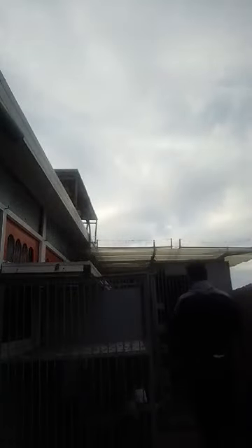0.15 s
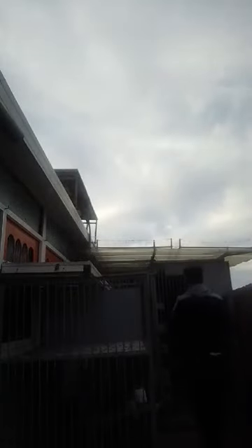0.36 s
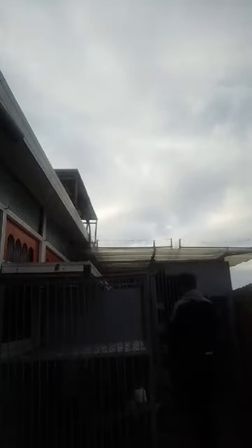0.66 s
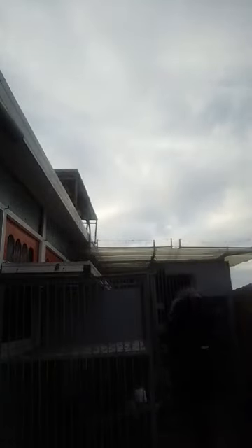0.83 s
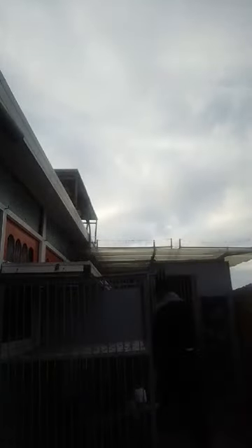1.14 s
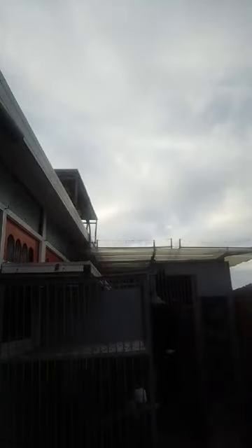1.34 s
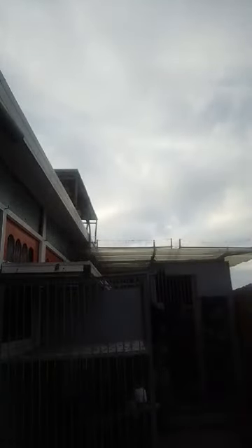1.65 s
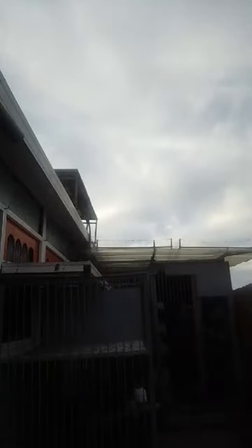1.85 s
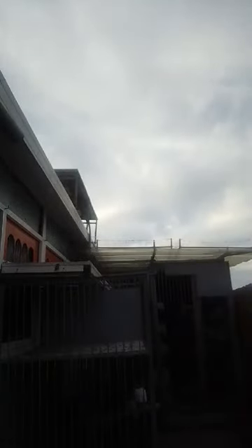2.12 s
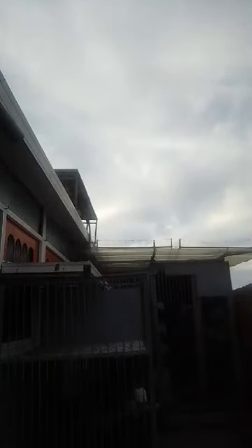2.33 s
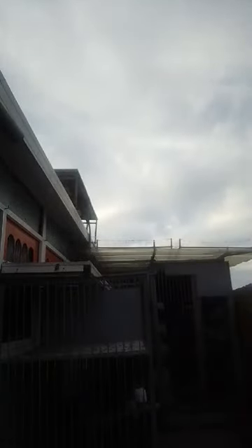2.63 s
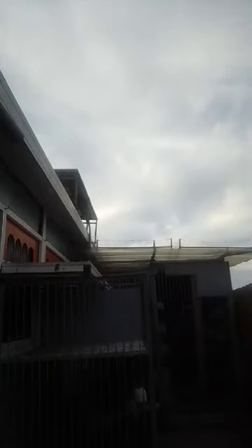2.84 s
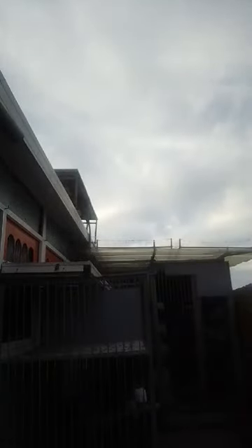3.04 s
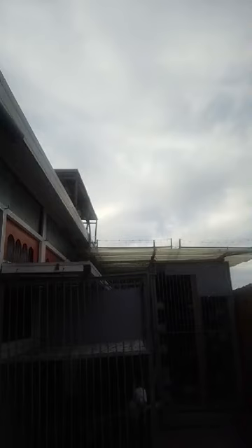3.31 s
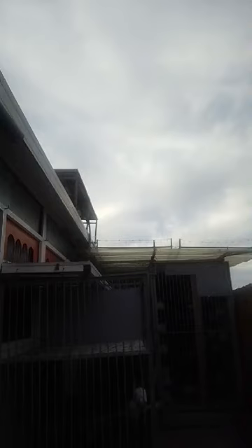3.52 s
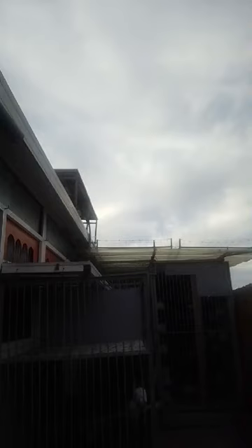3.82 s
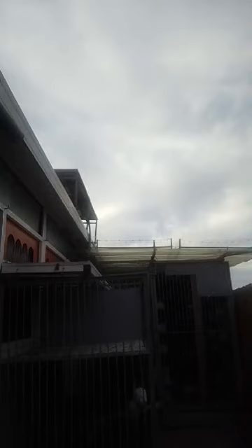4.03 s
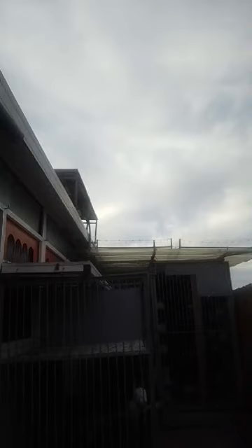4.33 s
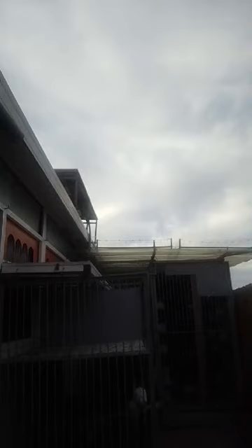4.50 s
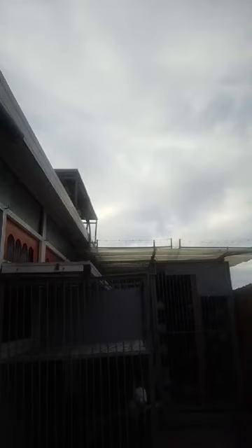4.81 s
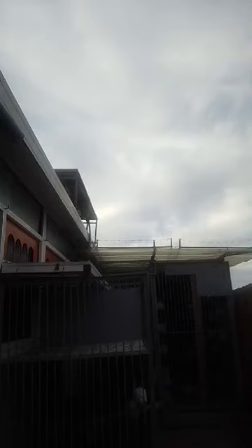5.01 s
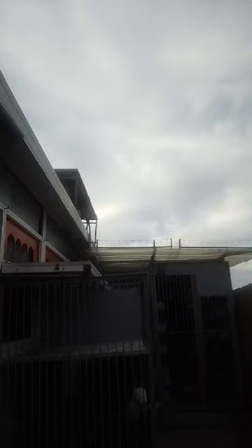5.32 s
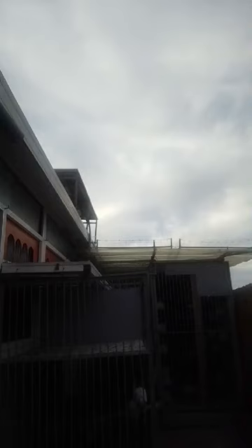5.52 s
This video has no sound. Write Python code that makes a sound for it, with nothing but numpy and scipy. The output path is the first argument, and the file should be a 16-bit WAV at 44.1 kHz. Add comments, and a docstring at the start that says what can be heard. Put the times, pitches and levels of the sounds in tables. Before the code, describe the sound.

A quiet outdoor rooftop loft, heard close in mono with little deep bass and softened top treble. From 0 to 0.15 s, crisp claw ticks and gritty scuffs crackle on boards, with another sharp tick at 0.64 s. A pigeon coos in short, rolling, fluttering phrases around 0.55-1.1, 1.6-2.25 and 2.85-3.4 s, low and throaty over a breathy murmur. Scuffing swells around 1.5-2 s, with small hollow wooden knocks scattered throughout. At about 3.05-3.25 s a hinge gives thin, high, rough squeaks, then at 3.3 s the metal gate slams: a loud, dense rattle whose treble dies first, lower clatter lingering through roughly half a second. A faint lower squeak follows at 3.75 s. Coos return at 4.2-4.65 and 5.35-5.65 s, with ticks and shuffling around 4.9-5.2 s, knocks, and a mid-high squeak swelling at 5.5 s. Faint floor thuds and distant town hum and breeze lie beneath.

```python
"""Rooftop loft, outdoors: a pigeon coos in short rolled phrases, sliding, fluttering tones over a rough murmur.
Close by, feet and claws scuff the boards (clicky noise through resonances) and knock on perches.
A wire gate squeaks on its hinge in stick-slip tones and slams as a rattle that dies band by band.
Behind them lie thuds through the floor and the far air, both shaped noise.
The microphone channel is mono; near sounds lose their deep bass, and the top treble is cut."""
import sys
import numpy as np
from scipy import signal
from scipy.io import wavfile

SR = 44100
rng = np.random.default_rng(int(sys.argv[2]) if len(sys.argv) > 2 else 0)


def put_to_file(sound):
    """Save the sound as 16-bit audio at rate SR, in the file named by the first command-line argument."""
    columns = np.atleast_2d(sound).T  # one column per channel
    safe = np.clip(columns, -1, 1)
    whole_steps = np.round(safe * 32767)
    wavfile.write(sys.argv[1], SR, whole_steps.astype(np.int16))


N = 249606   # samples

# Levels are those at the source, before echoes, bass cut and treble cut.
# High throbs of the coo, short and sagging: [peak t/s, length/s between edges, f/Hz at peak, peak level/dB]
HIGH_THROBS = [(0.555, 0.032, 433, -57), (0.643, 0.039, 401, -55.5), (0.691, 0.03, 372, -56),
               (0.718, 0.017, 409, -38), (0.746, 0.021, 400, -42), (0.777, 0.046, 377, -44.5),
               (0.8, 0.045, 431, -51), (0.957, 0.028, 387, -59), (1.029, 0.059, 409, -56),
               (1.061, 0.042, 384, -52.5), (1.119, 0.13, 456, -62), (1.531, 0.028, 402, -54),
               (1.63, 0.014, 518, -50), (1.7, 0.088, 405, -52.5), (1.745, 0.02, 453, -44),
               (1.762, .026, 375, -50.5), (1.807, 0.07, 395, -47), (1.869, 0.015, 410, -33),
               (1.895, 0.019, 431.4, -43), (1.93, 0.046, 403, -43.5), (2.113, 0.038, 379, -49),
               (2.187, 0.094, 390.6, -59), (2.255, 0.07, 432, -60.5), (2.684, 0.068, 375, -66),
               (2.72, 0.067, 478, -65), (2.84, .03, 417, -64), (2.89, 0.055, 373, -59),
               (2.962, 0.022, 396, -43), (2.996, 0.037, 373, -43), (3.028, 0.022, 394, -34.5),
               (3.06, .047, 360, -40.5), (3.117, 0.06, 360, -47.5), (3.141, 0.041, 408, -50.5),
               (3.188, .025, 367, -52.5), (3.272, 0.035, 366, -42), (3.316, 0.095, 363, -43),
               (4.226, .02, 383, -49), (4.255, 0.035, 392, -50), (4.304, 0.049, 362, -43),
               (4.338, 0.13, 387.3, -53.5), (4.402, 0.017, 363, -53.5), (4.474, .025, 363, -54),
               (4.517, 0.042, 377, -42), (4.558, 0.04, 368.5, -40.5), (4.603, 0.059, 378.5, -50),
               (4.633, .045, 377, -51), (4.911, 0.026, 412, -50.5), (5.353, 0.054, 402, -48),
               (5.385, 0.094, 334, -54), (5.407, 0.018, 417, -34), (5.427, 0.037, 483, -40.5),
               (5.441, .016, 436, -52), (5.456, 0.02, 396, -38), (5.481, 0.029, 408, -44),
               (5.567, .035, 429, -49), (5.65, .03, 444, -55.5)]
# Low pulses of the roll, each sliding upward: [peak t/s, peak level/dB]
LOW_PULSES = [(0.6, -57.5), (0.665, -47.5), (0.786, -46), (0.994, -53.5), (1.09, -61.5), (1.828, -49.5),
              (1.9, -57), (1.937, -46.5), (2.137, -47.5), (2.19, -62), (2.254, -66), (2.868, -68),
              (2.912, -56.5), (2.989, -51), (3.079, -44), (3.157, -45), (3.337, -42.5), (3.388, -44.5),
              (3.418, -41), (4.175, -57.5), (4.25, -47.5), (4.306, -44), (4.37, -45), (4.516, -61),
              (4.542, -46.5), (4.606, -50), (4.657, -59), (5.507, -46), (5.572, -51.5), (5.612, -62)]
LOW_HZ, LOW_LENGTH_S = 298, 0.044
LOW_RISE, HIGH_SAG = 0.11, 0.036   # half the share of its pitch that a throb slides in one length
SWELL_SHARE = 0.43   # part of a throb's length that lies before its peak

# Resonances of the coo's murmur: [f/Hz, width/Hz of each of two passes, relative level/dB]
MURMUR_MODES = [(298.6, 53, 1), (382.7, 114, 5.5), (460, 130, -5)]
# Phrases under which the murmur swells: [start t/s, held/s, target level/dB]
MURMUR_PHRASES = [(0.0, 0.044, -71), (0.35, 0.068, -70), (0.6, 0.27, -76.5), (0.97, 0.066, -60.5),
                  (1.45, 0.39, -72), (1.78, 0.21, -56), (2.08, .15, -60.5), (2.37, 0.024, -80),
                  (2.65, 0.06, -72), (2.83, 0.11, -67.5), (2.97, 0.29, -63.5), (3.42, 0.089, -50.5),
                  (3.95, 0.28, -72), (4.55, 0.23, -67), (4.87, 0.33, -68), (5.33, 0.41, -59)]
MURMUR_BED_DB, MURMUR_RISE_S, MURMUR_T60_S = -90, 0.034, 0.5

# Claw and grit ticks, and at 3.33 s the sharp crack as the gate hits its frame: [t/s, peak level/dB, level/dB
# of the scrape, level/dB of the shaken mesh and boards]
CLAW_TICKS = [(0.0339, -30.5, -40, -80), (0.0416, -37, -60, -79), (0.0476, -37.5, -61, -82),
              (0.0946, -39.5, -41.5, -63), (0.1458, -31.5, -40.5, -56), (0.3357, -50.5, -64.5, -72),
              (0.43, -75, -69, -77), (0.533, -70, -65.5, -72), (0.637, -30.5, -40.5, -59.5),
              (0.754, -70, -58.5, -85), (0.884, -57.5, -72, -73), (1.01, -63, -67, -77),
              (1.07, -66, -75, -77), (1.2366, -52, -63.5, -69), (1.4383, -50, -53, -61),
              (1.542, -45, -43, -60), (1.6412, -38.5, -40, -57.5), (1.745, -67, -54.5, -63),
              (1.983, -47.5, -81, -82), (2.041, -55, -48.5, -49), (2.101, -51, -50.5, -57),
              (2.3235, -51, -74, -96), (2.373, -53, -57, -68), (2.599, -62, -70, -75),
              (3.187, -56, -52.5, -85.5), (3.2025, -59, -75, -88), (3.33, -52, -53, -70),
              (3.6115, -50, -62.5, -71), (3.7832, -47, -57, -99), (4.099, -59, -81, -75),
              (4.21, -72, -74, -74), (4.4656, -61, -66.5, -73), (4.702, -64, -56, -74),
              (4.73, -48.5, -54, -77), (4.8749, -42, -49.5, -60), (4.9724, -43.5, -43.5, -74),
              (5.017, -44, -43, -61), (5.0738, -43, -55, -64), (5.157, -49, -48, -86),
              (5.2664, -69, -56, -65)]
# Colour of one tick: [f/Hz, level/dB per Hz]
TICK_SPECTRUM = [(1000, -30), (1600, -14), (3000, -5), (4600, 0), (6000, -6)]
# Hiss of grit under feet: [f/Hz, level/dB per Hz]
GRIT_SPECTRUM = [(1350, -82.5), (2300, -12.5), (3030, -19.5), (3920, -2), (4520, 0), (6530, -38),
                 (13700, -32), (14500, -38), (15000, -61)]
# Mesh wires ringing under the grit: [lowest f/Hz, highest f/Hz, width/Hz of each of two passes]
WIRE_RANGE = (2500, 6900, 57)
# Resonances of the boards: [f/Hz, width/Hz of each of two passes, relative level/dB]
BOARD_MODES = [(693, 262, 16), (811, 130, 7.5), (978, 35, 5), (474.5, 98, 12)]
# Resonances of the mesh: [f/Hz, width/Hz of each of two passes, relative level/dB]
MESH_MODES = [(1636, 290, 10.5), (2190, 170, 0), (2830, 130, 4)]
# Bustle about the loft: [t/s, grit level/dB, boards level/dB]
BUSTLE_CURVE = [(0.0, -55, -55.5), (0.04, -65.5, -68), (0.2, -63.5, -75.5), (0.3, -75, -79),
                (0.6, -85.5, -92), (1.0, -81, -83), (1.3, -68.5, -75), (1.5, -57.5, -58.5),
                (1.75, -63.5, -56.5), (1.93, -64, -54.5), (2.02, -64.5, -68.5), (2.15, -62, -73),
                (2.3, -70.5, -71), (2.43, -71.5, -68), (2.53, -75.5, -95), (2.7, -78, -77),
                (2.85, -72, -75), (3.0, -79.5, -76.5), (3.17, -93, -82), (3.6, -102, -54.5),
                (3.76, -66, -76), (3.95, -80.5, -76.5), (4.22, -75.5, -72), (4.44, -88, -88.5),
                (4.75, -80, -64), (4.85, -69, -71), (5.0, -61, -57.5), (5.25, -63, -60.5), (5.44, -70, -63),
                (5.66, -73.5, -72)]
MESH_VS_BUSTLE_DB = -10   # against the mean of the grit and boards levels
BOARDS_VS_MESH_DB = -4.5   # when a tick shakes both
SCRAPE_T60_S, SHAKE_T60_S = 0.17, 0.22

# Hinge squeaks: [start t/s, start f/Hz, top level/dB rms, top level/dB rms of the octave, rise/s, fade t60/s,
# glide/Hz per s, roughness 0-1]
HINGE_SQUEAKS = [(2.765, 4560, -65, -95, .01, .25, 300, .8), (3.047, 4290, -44, -85, .015, .33, -300, .55),
                 (3.05, 3740, -58, -95, .03, .5, -100, .8), (3.184, 4240, -45, -85, .014, .14, 2500, .7),
                 (3.181, 3630, -63, -95, .008, .3, 500, .9), (3.21, 4370, -45, -85, .048, .2, 1500, .5),
                 (3.195, 2900, -68, -95, .035, .2, 50, .6), (3.745, 2150, -60, -77, .03, .45, -50, .5),
                 (5.45, 2105, -50, -37, .115, .5, 20, .4), (5.15, 2790, -56, -62, .014, .56, -250, .9)]

# Colour of the slam: [f/Hz, relative level/dB per Hz]
SLAM_SPECTRUM = [(200, -20), (300, -3.5), (460, -9), (620, 0.5), (850, -9.5), (1200, -27), (1450, -11.5),
                 (3000, -7), (4300, 6), (5200, -0.5), (6500, -16), (8400, -49), (9700, -38.5), (13500, -18)]
# Fade of the slam: [f/Hz, t60/s]
SLAM_FADE = [(200, 1), (530, 0.66), (1390, 0.67), (3680, 0.36), (5000, 0.25), (6500, .17), (9700, 0.11)]
SLAM_S, SLAM_DB = 3.315, -29   # start; rms level of the first 0.1 s
SLAM_RISE_S, BASS_LAG_CYCLES = 0.011, 8.0   # each band takes the rise plus this many of its cycles

# Hollow knocks on perches and boxes: [t/s, level/dB before the onset is softened, f/Hz]
WOOD_KNOCKS = [(0.153, -43, 810), (0.425, -52.5, 613), (0.785, -53.5, 1014), (0.787, -56, 798),
               (0.81, -56.5, 1010), (1.012, -59, 797), (1.164, -53, 567), (1.239, -57, 691),
               (1.36, -56, 668), (2.393, -55, 735), (3.612, -42.5, 840), (4.469, -41, 678),
               (4.774, -51, 718), (4.973, -45, 949), (5.273, -46, 679), (5.314, -43.5, 642)]
KNOCK_T60_S = 0.12

# Echoes off walls around the roof: [delay t/s, level/dB]
WALL_ECHOES = [(.013, -16), (.029, -25.5), (0.048, -14)]

# Resonances of the floor: [f/Hz, width/Hz of each of two passes, relative level/dB]
THUD_MODES = [(74.4, 36, -4), (110, 19, -6.5)]
# Heavy steps felt through the roof: [t/s, level/dB before the onset is softened]
HEAVY_STEPS = [(0.1, -77), (0.6, -80), (1.0, -86), (1.85, -71), (2.05, -77), (2.24, -93), (3.0, -88),
               (3.32, -73), (3.47, -76), (4.201, -93), (4.68, -93), (4.86, -69), (5.07, -70), (5.5, -78),
               (5.63, -71)]
THUD_BED_DB, THUD_T60_S = -91, 0.41

# Colour of the far air: [f/Hz, relative level/dB per Hz]
AIR_SPECTRUM = [(26, -56), (45, -25.5), (156, -21.5), (281, -6), (386, 2.5), (614, -5.5), (804, -7),
                (1220, -17), (1710, -19.5), (2410, -17.5), (4550, -11.5), (8190, -21.5), (12100, -22),
                (13300, -14), (15400, -41.5)]
AIR_DB = -73   # rms
BASS_CUT_HZ, TREBLE_STEP_HZ, CUTOFF_HZ = 202, 15000, 15600


def coo(edge_db=-12, squareness=2.6, rough=0.14):
    """Each throb is a tone from the inflated throat that starts and stops briskly, slides in pitch and flutters."""
    throbs = [(*row, -HIGH_SAG) for row in HIGH_THROBS]
    throbs += [(s, LOW_LENGTH_S, LOW_HZ, db, LOW_RISE) for s, db in LOW_PULSES]
    out, start_turn = np.zeros(N), rng.random(len(throbs))
    flutter = fuzz(rough, rate=43.3)
    for k, (s, length, hz, db, slide) in enumerate(throbs):
        at = np.arange(round((s - length) * SR), min(round((s + length) * SR), N))
        t = at / SR - s
        side = np.where(t < 0, SWELL_SHARE, 1 - SWELL_SHARE)
        shape = from_db(db + edge_db * np.abs(t / length / side) ** squareness)
        phase = 2 * np.pi * (hz * t * (1 + slide * t / length) + start_turn[k])
        own_flutter = np.roll(flutter, 997 * k)[at]   # another stretch for each throb
        out[at] += shape * np.real(own_flutter * np.exp(1j * phase))
    return out


def coo_murmur():
    """The rough, breathy murmur of the coo: noise resonating in its pitch range, swelling under each phrase."""
    level = from_db(MURMUR_BED_DB) + bursts(MURMUR_PHRASES, MURMUR_RISE_S, MURMUR_T60_S)
    return level * from_db(2.0 * drift(15)) * resonate(rng.standard_normal(N), MURMUR_MODES)


def scuffing():
    """Grit hisses under feet, boards rumble in lumps and the mesh buzzes; ticks leave short scrapes."""
    grit_db, boards_db = in_time(BUSTLE_CURVE)
    s, _, scrape_db, shake_db = np.transpose(CLAW_TICKS)
    scrapes = bursts(zip(s, 0 * s, scrape_db), 0.005, SCRAPE_T60_S)
    shake = bursts(zip(s, 0 * s, shake_db), 0.0075, SHAKE_T60_S)

    effort = from_db(grit_db + 2.0 * drift(42)) + scrapes
    grit = effort * gritty_noise()

    rub = grains(per_s=500, spread_db=2.5, smooth=0.67)
    boards_level = from_db(boards_db) + from_db(BOARDS_VS_MESH_DB) * shake
    boards = boards_level * from_db(2.0 * drift(12)) * resonate(rub[0], BOARD_MODES)

    mesh_level = from_db((grit_db + boards_db) / 2 + MESH_VS_BUSTLE_DB) + shake
    mesh_rub = rub[1] + 1.9 * rub[0]   # partly the same rubbing as the boards
    mesh = mesh_level * from_db(1.0 * drift(39)) * resonate(mesh_rub, MESH_MODES)
    return claw_ticks() + grit + boards + mesh


def claw_ticks():
    """Each tick is one click ringing briefly through the tick's colour."""
    s, db, _, _ = np.transpose(CLAW_TICKS)
    clicks = np.zeros(N)
    clicks[np.round(s * SR).astype(int)] = from_db(db)
    impulse = np.eye(1, 400).repeat(2, axis=0)
    ring = sum(band for _, band in bands(impulse, TICK_SPECTRUM))
    # claws are blunter than grit
    ring = signal.sosfilt(signal.butter(8, 6300, fs=SR, output="sos"), ring)
    return np.convolve(clicks, ring / np.abs(ring).max())[:N]


def gritty_noise():
    """Rubbed sand: a band-by-band wandering hiss with wires ringing under it, rms 1."""
    sand = grains(per_s=1500, spread_db=2.0, smooth=1.0)
    hiss = rms_one(sum(band * from_db(2.4 * drift(6)) for _, band in bands(sand, GRIT_SPECTRUM)))
    return rms_one(hiss + from_db(-6) * wires(sand[0]))


def wires(sand, count=18, swing_db=3.0):
    """Narrow wire notes; which wires are rubbed changes from moment to moment."""
    low, high, width = WIRE_RANGE
    pitches = np.geomspace(low, high, count) * (1 + 0.023 * rng.standard_normal(count))
    out = 0
    for hz in pitches:
        level = from_db(at_hz(GRIT_SPECTRUM, hz) + swing_db * drift(2.2))
        out = out + level * resonate(sand, [(hz, width, 0)])
    return rms_one(out)


def hinge(throb_db=2.0, lasts=0.42, release_s=0.02):
    """Stick-slip tones that swell, fade and let go, the octave more steeply, blurred by uneven slips."""
    out, slips = np.zeros(N), fuzz(1, rate=75.0)
    throb = from_db(throb_db * drift(30))
    for k, (s, hz, db, octave_db, rise, t60, glide, rough) in enumerate(HINGE_SQUEAKS):
        length = rise + lasts * t60   # cut off before the fade is done
        at = np.arange(round(s * SR), min(round((s + length) * SR), N))
        t, rough = at / SR - s, np.clip(rough, 0, 1)
        swell_db = -28 * np.abs(1 - t / rise) ** 1.33
        shape_db = np.where(t < rise, swell_db, -60 * (t - rise) / t60)
        turn = np.exp(2j * np.pi * (hz * t + glide * t ** 2 / 2))
        tone = from_db(db + shape_db) * turn + from_db(octave_db + 2.06 * shape_db) * turn ** 2
        own_slips = np.roll(slips, 1999 * k)[at]   # another stretch for each squeak
        blur = np.sqrt(1 - rough) + np.sqrt(rough) * own_slips
        let_go = np.minimum((length - t) / release_s, 1)
        out[at] += np.sqrt(2) * throb[at] * let_go * np.real(blur * tone)
    return out


def slam():
    """The gate hits its frame: a dense rattle that dies band by band, the lows building up later."""
    t, out = np.maximum(np.arange(N) / SR - SLAM_S, 0), 0
    rattle = grains(per_s=2500, spread_db=1.0, smooth=0.92)
    for hz, band in bands(rattle, SLAM_SPECTRUM):
        rise = 1 - np.exp(-(t / (SLAM_RISE_S + BASS_LAG_CYCLES / hz)) ** 2)
        fade = from_db(-60 * t / at_hz(SLAM_FADE, hz) + 2.7 * drift(17))
        out = out + band * rise * fade
    return from_db(SLAM_DB) * out / out[round(SLAM_S * SR):][:SR // 10].std()


def knocks(rise_s=0.0047):
    """Each knock is one rough, damped wooden note."""
    out, rattle = np.zeros(N), fuzz(0.48, rate=65.0)
    for s, db, hz in WOOD_KNOCKS:
        first = round(s * SR)
        t = np.arange(N - first)[:SR // 2] / SR
        level = from_db(db - 60 * t / KNOCK_T60_S) * (1 - np.exp(-t / rise_s))
        note = level * np.exp(2j * np.pi * hz * t)
        out[first:][:len(t)] += np.real(note * rattle[first:][:len(t)])
    return out


def loft_echo(x):
    """A few echoes off nearby walls, each a delayed, weaker copy."""
    echoes = sum(from_db(db) * np.roll(x, round(s * SR)) * (np.arange(N) > s * SR) for s, db in WALL_ECHOES)
    return x + echoes


def footfalls():
    """Weight shifting on the roof thuds up through the floor as bursts of low resonant noise."""
    steps = [(s, 0, db) for s, db in HEAVY_STEPS]
    level = from_db(THUD_BED_DB) + bursts(steps, 0.018, THUD_T60_S)
    return level * from_db(1.0 * drift(14)) * resonate(rng.standard_normal(N), THUD_MODES)


def air(patchy_db=2.5, steady_hz=3000):
    """Far town hum and breeze: noise that wanders band by band; the treble hiss is steadier."""
    together, noise, out = drift(1.3), rng.standard_normal((2, N)), 0
    for hz, band in bands(noise, AIR_SPECTRUM):
        wander_db = patchy_db / (1 + hz / steady_hz) * (0.27 * together + drift(7))
        out = out + band * from_db(wander_db)
    return from_db(AIR_DB) * rms_one(out)


def from_db(db):
    """Gain of a level in dB."""
    return 10 ** (np.asarray(db) / 20)


def rms_one(x):
    """Scaled to rms 1."""
    return x / np.sqrt(np.mean(x ** 2) + 1e-20)


def in_time(rows):
    """Columns of a curve at every sample."""
    s, *columns = np.transpose(rows)
    return [np.interp(np.arange(N) / SR, s, c) for c in columns]


def at_hz(points, hz):
    """The second column read on a log-frequency axis."""
    points = np.array(points)
    return np.interp(np.log(hz), np.log(points[:, 0]), points[:, 1])


def drift(rate):
    """Slow chance of rms 1: noise through two equal one-pole low-passes at rate Hz."""
    r = np.exp(-2 * np.pi * rate * 20 / SR)   # drawn at every 20th sample
    noise = rng.standard_normal(N // 20 + 2002)
    slow = signal.lfilter([1], [1, -2 * r, r * r], noise)[2000:]   # settled part
    return np.interp(np.arange(N) / 20, np.arange(len(slow)), rms_one(slow))


def fuzz(share, rate):
    """Complex gain near 1 that shakes a tone's level and phase, widening its line."""
    share = np.clip(share, 0, 1)
    return np.sqrt(1 - share) + np.sqrt(share / 2) * (drift(rate) + 1j * drift(rate))


def bursts(events, rise_s, t60):
    """Gain that rises at each (t/s, held/s, level/dB), holds and dies away."""
    out = np.zeros(N)
    for s, held, db in events:
        at = np.arange(round(s * SR), min(round((s + held + t60) * SR), N))
        t = np.maximum(at / SR - s, 0)
        fade_db = -60 * np.maximum(t - held, 0) / t60
        out[at] += from_db(db + fade_db) * (1 - np.exp(-t / rise_s))
    return out


def grains(per_s, spread_db, smooth):
    """Two streams of uneven random clicks on a bed of noise."""
    sizes = from_db(spread_db * np.minimum(rng.exponential(1, (2, N)), 5))
    clicks = sizes * (rng.random((2, N)) < per_s / SR) * rng.choice([-1, 1], (2, N))
    return rms_one(clicks) + smooth * rng.standard_normal((2, N))


def bands(sources, spectrum):
    """Third-octave bands of two sources, dealt in turn and weighted by a spectrum: (f/Hz, band)."""
    edges = 30 * 2 ** (np.arange(28) / 3)
    for k, (low, high) in enumerate(zip(edges, edges[1:])):
        hz = np.sqrt(low * high)
        if spectrum[0][0] < hz:
            sos = signal.butter(2, [low, high], "band", fs=SR, output="sos")
            yield hz, from_db(at_hz(spectrum, hz)) * signal.sosfilt(sos, sources[k % 2])


def resonate(x, modes):
    """Parallel resonances, each applied twice for steep skirts; rms 1."""
    out = 0
    for hz, width, db in modes:
        r = np.exp(-np.pi * width / SR)
        poles = [1, -2 * r * np.cos(2 * np.pi * hz / SR), r * r]
        once = signal.lfilter([1], poles, x)
        twice = signal.lfilter([1, 0, -1], poles, once)
        out = out + from_db(db) * rms_one(twice)
    return rms_one(out)


def scene():
    """All sources, mono; all near sounds lose their deep bass in a steep cut."""
    near = loft_echo(coo() + hinge() + knocks()) + scuffing() + slam() + coo_murmur()
    near = signal.sosfilt(signal.butter(6, BASS_CUT_HZ, "high", fs=SR, output="sos"), near)
    return (near + footfalls() + air())[None]


def record(dry):
    """The highest treble steps down by 22 dB, then the top is cut."""
    dry = signal.sosfilt(signal.cheby2(10, 22, TREBLE_STEP_HZ, fs=SR, output="sos"), dry)
    return signal.sosfilt(signal.cheby2(12, 70, CUTOFF_HZ, fs=SR, output="sos"), dry)


dry = scene()
out = record(dry)
put_to_file(out)
```